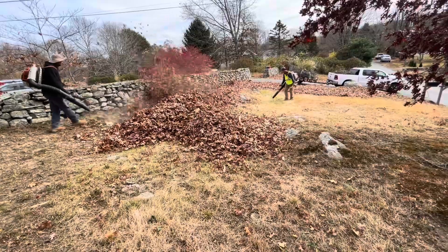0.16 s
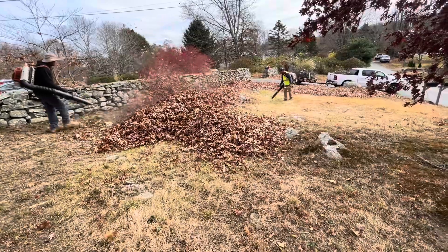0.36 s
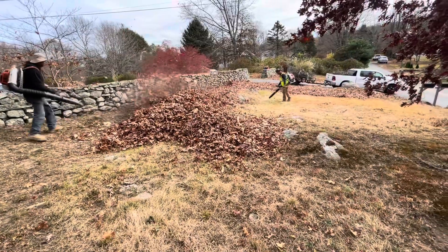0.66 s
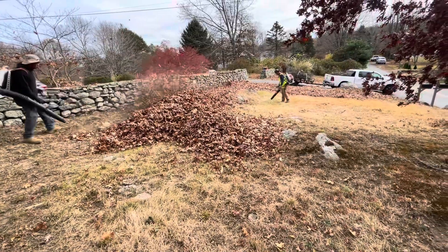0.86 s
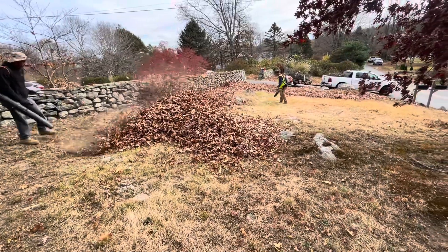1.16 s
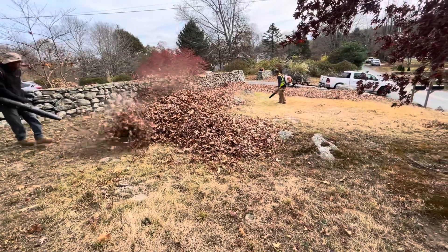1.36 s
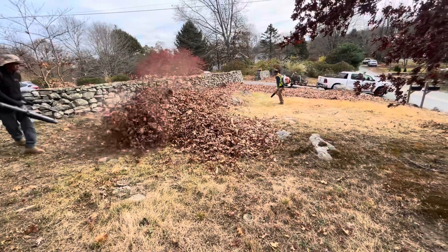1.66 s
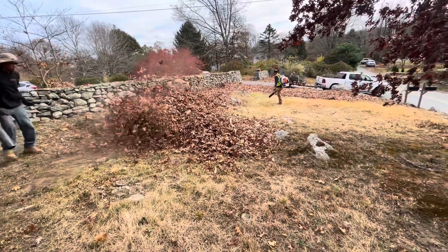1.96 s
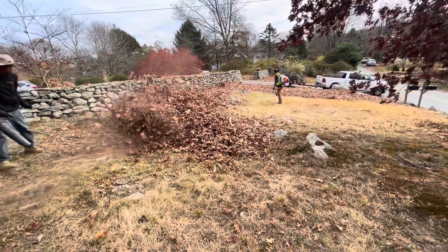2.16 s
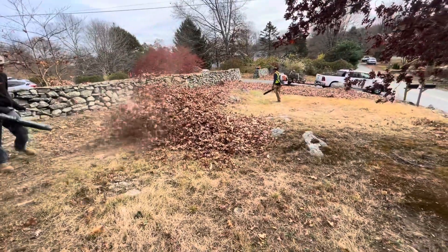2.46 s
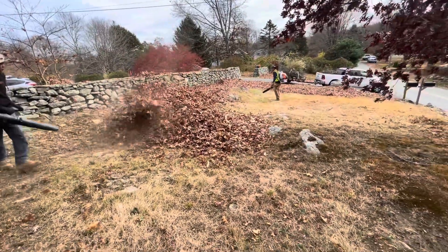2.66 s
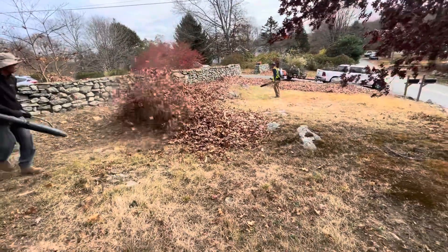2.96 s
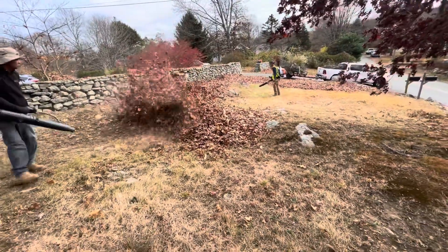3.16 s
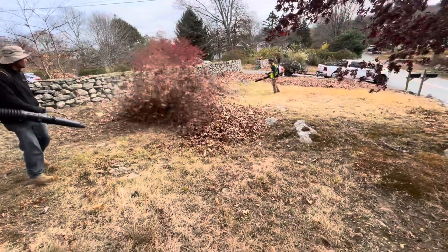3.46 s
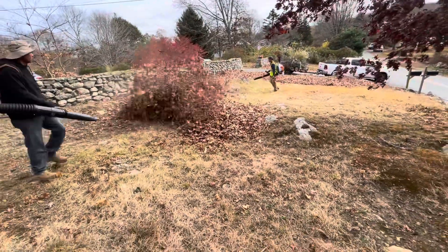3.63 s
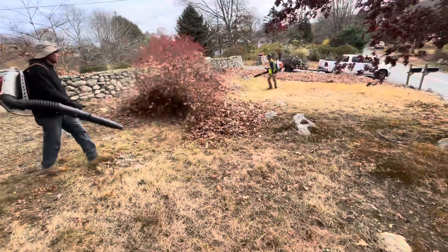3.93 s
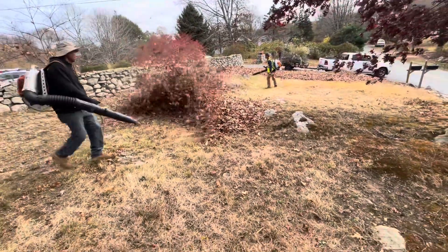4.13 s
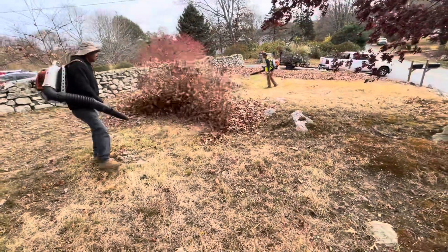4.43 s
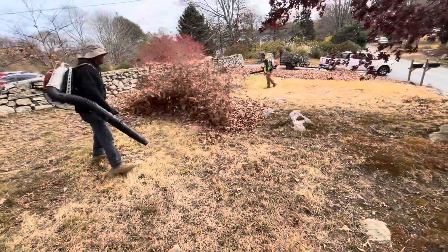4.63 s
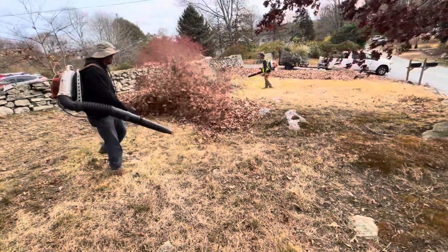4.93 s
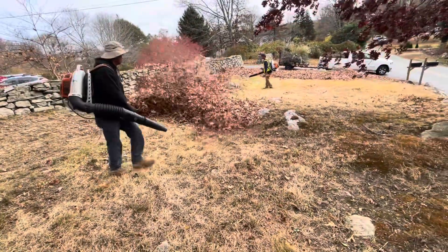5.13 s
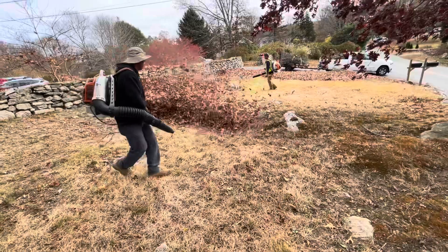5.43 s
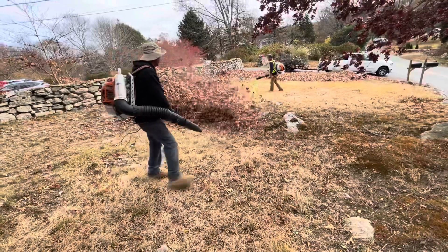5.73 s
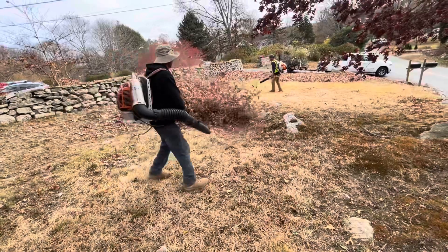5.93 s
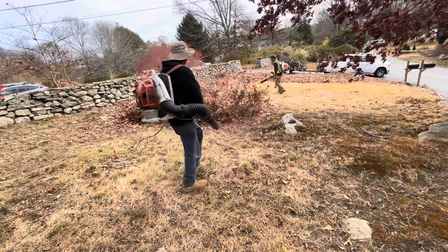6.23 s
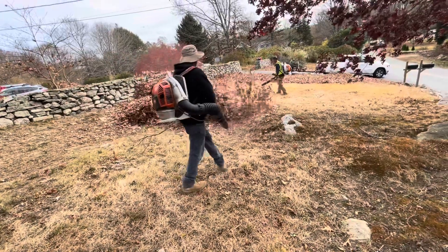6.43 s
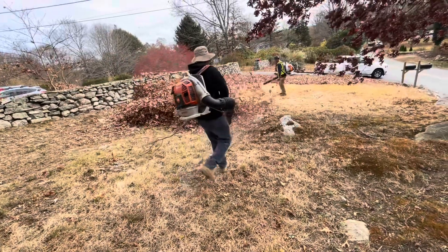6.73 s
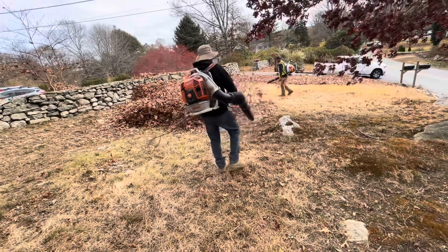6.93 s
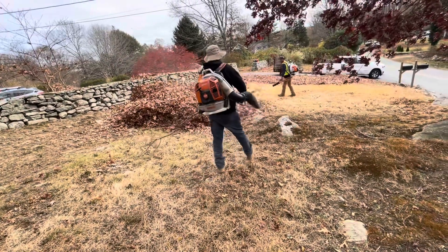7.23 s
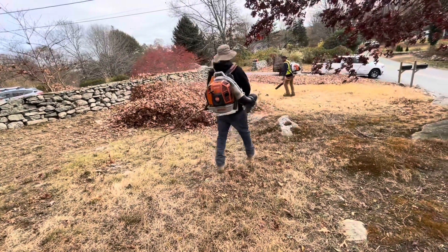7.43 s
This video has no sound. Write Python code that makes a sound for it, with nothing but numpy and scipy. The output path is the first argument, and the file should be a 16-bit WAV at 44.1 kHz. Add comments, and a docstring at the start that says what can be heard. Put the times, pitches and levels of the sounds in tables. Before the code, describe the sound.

A backpack leaf blower roars close by on the left, droning engine and rushing leafy air, while a second engine revs across a windy lawn.

```python
"""A four-stroke backpack leaf blower passes on the left of a phone, its engine summed from orders of the firing rate.
Its pipe roars from the start in patchy bands of noise, with leaves in the jet and valve clatter repeating every cycle.
From 1.2 s a second engine across the lawn revs up and falls back, a few tones tied to one gliding rate; low
noise thumps as wind gusts hit the ports. The near blower grows louder until 5 s, then swings from the left to ahead,
its carrier's back turned; at 6.2 s the far engine revs again briefly."""
import sys
import numpy as np
from scipy import signal
from scipy.fft import rfft, irfft, next_fast_len
from scipy.io import wavfile
from scipy.ndimage import uniform_filter1d, map_coordinates

SR = 44100
rng = np.random.default_rng(int(sys.argv[2]) if len(sys.argv) > 2 else 0)


def unload_audio(sound):
    """Save the sound as a 16-bit wav file, at the path given as the first command line argument."""
    columns = np.transpose(np.atleast_2d(sound))
    # keep every value between -1 and 1, then stretch to whole-number steps
    steps = np.round(np.clip(columns, -1, 1) * 32767)
    wavfile.write(sys.argv[1], SR, steps.astype(np.int16))


N = 334719
FRAME = 1024  # samples per short-time spectrum

# Bearing of the near blower: t/s, bearing (0 at the left to 1 ahead)
BEARING_PATH = [(0, 0.025), (2, 0.13), (4, 0.038), (5.5, 0.25), (6, 0.35), (7, 0.86), (7.59, 0.77)]


def amp(db):
    """Gain is ten to the power of level over 20."""
    return 10 ** (np.asarray(db) / 20)


def unit(x):
    """Normalisation: the signal at an rms value of 1."""
    return x / np.sqrt(np.mean(x ** 2) + 1e-20)


def along(points, at):
    """Linear interpolation of (place, value) points over a logarithmic place axis."""
    place, value = np.transpose(points)
    return np.interp(np.log(at + 1), np.log(place + 1), value)


def curves(rows):
    """Linear interpolation in time: one value per sample for each column after t/s."""
    s, *columns = np.transpose(rows)
    return [np.interp(np.arange(N) / SR, s, column) for column in columns]


def wobble(rate):
    """Random modulation: normal random knots, rate per second, joined by straight lines."""
    knots = rng.standard_normal(int(N * rate / SR) + 4)
    return np.interp(np.arange(N) * rate / SR, np.arange(len(knots)), knots)


def bump(s, length):
    """Gaussian rise and fall centred on s, length seconds wide between its 1/e points."""
    return np.exp(-(2 * (np.arange(N) / SR - s) / length) ** 2)


def noise(spectrum, patchy_db, bins, frames, clatter=0):
    """Spectral shaping: two independent noises share patches of random gain; the first may carry clatter."""
    source = rng.standard_normal((2, N))
    source[0] += clatter
    hz, _, z = signal.stft(source, SR, nperseg=FRAME)
    field = rng.standard_normal(z.shape[1:])
    field = uniform_filter1d(uniform_filter1d(field, bins, 0), frames, 1)
    inside = (hz > spectrum[0][0]) & (hz < spectrum[-1][0])
    gain = amp(along(spectrum, hz)[:, None] + patchy_db * unit(field))
    z = z * gain * inside[:, None]
    return unit(signal.istft(z, SR, nperseg=FRAME)[1][:, :N])


def wind():
    """Turbulent pressure at the ports: lumpy low thumps, their noise unrelated from port to port."""
    # Gusts: t/s, length/s, rise at left/dB, rise at right/dB
    gusts = [(1.42, .25, 4, 2), (1.9, .3, 6, 7), (2.06, .2, 5, 11), (2.33, 0.2, 11, 3), (2.8, .35, 7, 3),
             (3.15, .25, 9, 11), (3.33, .2, 8, 11), (3.6, 0.3, 10, 9), (4.2, 0.47, 6, 2), (4.66, .25, 8, 7),
             (4.92, .2, 9, 3), (5.28, .3, 9, 10), (5.55, .3, 4, 8), (6.2, .6, 2, 6), (6.6, 0.3, 5, 3),
             (7.05, .45, 10, 8)]
    # Spectrum of the buffeting: f/Hz, relative level/dB
    buffet = [(20, -40), (36, -22), (50, -2), (62, 2), (100, 0), (160, -3), (250, -43), (400, -60)]
    calm_db = np.array((-44.5, -46))[:, None]  # between gusts, left and right
    gust_db = sum(np.outer(rise_db, bump(s, length)) for s, length, *rise_db in gusts)
    lumps = amp(2.8 * np.array([wobble(15), wobble(21)]))
    thumps = unit(lumps * noise(buffet, patchy_db=0.5, bins=2, frames=3))
    return amp(calm_db + gust_db) * thumps


def far_engine():
    """Harmonic series of a firing rate: a few orders of the distant engine sound while it revs."""
    # Two bursts of revving, each with rows: t/s, fourth order f/Hz, level/dB before the colour
    bursts = [
        [(1.15, 160, -53), (1.38, 183.5, -55), (1.51, 196.5, -50), (1.67, 205, -41), (1.85, 213, -45),
         (2.1, 219, -45), (2.3, 222, -40.5), (2.6, 225.5, -43), (2.8, 227, -44), (3.1, 233, -37.5),
         (3.5, 235, -39.5), (4, 239, -37), (4.5, 238, -41), (4.62, 215, -46), (4.75, 190, -50)],
        [(6.2, 190, -43), (6.45, 202, -39), (6.6, 208, -43), (6.7, 208, -50)],
    ]
    # Multiples of the firing rate that stand out
    far_orders = (3, 4, 5, 9, 10, 11, 12, 13)
    # What its exhaust and the lawn let through: f/Hz, level/dB
    far_colour = [(140, -19), (180, -9), (200, 3), (240, -3.5), (265, -14), (460, -5), (520, -26), (550, 2),
                  (610, -10.5), (665, -3), (720, -12)]
    out = np.zeros(N)
    t = np.arange(N) / SR
    for rows in bursts:
        fourth_hz, level_db = curves(rows)
        rate = fourth_hz / 4  # firings per second
        angle = 2 * np.pi * np.cumsum(rate) / SR
        start, end = rows[0][0], rows[-1][0]
        fade = np.clip(np.minimum(t - start, end - t) / 0.036, 0, 1)
        for k in far_orders:
            order_db = level_db + along(far_colour, k * rate) + 1.6 * wobble(5)
            phase = round(k) * angle + .02 * k * wobble(8) + rng.uniform(0, 2 * np.pi)
            out += fade * amp(order_db) * np.cos(phase)
    return np.sqrt(2) * out


def carrier():
    """Distance and directivity: nearness and treble about their means, exhaust note in dB, and bearing."""
    # Near blower: t/s, loudness/dB, exhaust note level/dB, treble level of the jet/dB
    approach = [(0.0, -27.5, -27, -30), (0.04, -26.5, -27.5, -32), (0.59, -28, -27.5, -32),
                (1.22, -27, -30.5, -34), (2.28, -26.5, -27, -38), (2.56, -24.5, -26.5, -33),
                (2.73, -26, -27.5, -36), (3.34, -24.5, -26, -35), (3.74, -23, -26, -29),
                (4.18, -23, -26, -32), (4.46, -22, -28.5, -30.5), (4.69, -22, -25, -31),
                (5.22, -21, -25, -22.5), (6.24, -22.5, -30, -25), (6.59, -22, -27.5, -34.5),
                (6.96, -22.5, -29.5, -32.5), (7.53, -22.5, -28, -30.5), (7.59, -21.5, -29, -26)]
    near_db, note_db, treble_db = curves(approach)
    bearing, = curves(BEARING_PATH)
    return near_db - near_db.mean(), note_db, treble_db - treble_db.mean(), bearing


def air_levels():
    """Source directivity: each air layer's level follows distance, treble and bearing, with a slow unrest."""
    # A layer swells or sinks as the pipe swings: t/s, layer name, length/s, change/dB
    sweeps = [(.4, "roar", 0.86, 0), (0.604, "hiss", 0.74, 0), (1, "fizz", 1.1, 1), (2, "rumble", 0.43, 3),
              (2.1, "rush", 0.94, 2), (2.5, "hiss", 0.81, -2), (2.9, "sizzle", 1, -0.5),
              (4, "rush", 0.59, 3.5), (4.4, "roar", 0.55, -1.5), (4.904, "rush", 0.46, 1),
              (5.702, "sizzle", 2.5, 0), (6.094, "fizz", 1.7, -2), (6.397, "roar", 0.25, -2.5),
              (7.095, "roar", 0.88, -0.5), (6.6, "rumble", 0.9, 1), (2.9, "rumble", .7, -1),
              (.9, "rumble", 0.46, 1), (1.8, "roar", 0.93, 2), (.2, "rumble", .5, 0),
              (7.2, "sizzle", 0.83, 1), (7.253, "fizz", 0.43, 3), (7.4, "hiss", 0.53, -1)]
    near_db, _, treble_db, bearing = carrier()
    # base level/dB, dB per dB of nearness, dB per dB of treble, dB per unit of bearing
    layers = dict(
        rumble=(-38.5, 1.33, -0.18, 0),
        roar=(-30, 0.58, -0.06, -1.5),
        rush=(-35, -0.2, 0.42, 5),
        hiss=(-34, 0, 0.77, 0.5),
        sizzle=(-33.5, 0.02, 0.54, -0.5),
        fizz=(-37, 0.33, 0.5, 0.5))
    levels = {}
    for name, (db, per_near, per_treble, turned_db) in layers.items():
        steady_db = db + per_near * near_db + per_treble * treble_db + turned_db * bearing
        levels[name] = steady_db + .6 * wobble(6)
    for s, name, length, db in sweeps:
        levels[name] = levels[name] + db * bump(s, length)
    return levels


def valve_clatter(angle, change):
    """Cyclic noise: a random rattle that repeats every cycle and renews itself change times a second."""
    steps = 706  # random values per cycle
    pattern = rng.standard_normal((int(N * change / SR) + 3, steps))
    place = angle / (2 * np.pi) % 1 * (steps - 1)
    return unit(map_coordinates(pattern, [np.arange(N) * change / SR, place], order=1))


def air(angle):
    """Turbulence noise of fan, exhaust and leafy jet, level-modulated once a firing except in the rumble."""
    # Spectra of the six layers, low to high: f/Hz, relative level/dB
    rumble_band = [(120, -29), (190, -4), (260, -4.5), (340, -3.5), (410, -9), (450, -13), (520, -30)]
    roar_band = [(400, -16), (500, -13), (580, -12), (650, -11), (720, -7), (800, -6), (900, -9),
                 (980, -11), (1050, -15), (1200, -12.5), (1350, -10.5), (1500, -21.5), (1750, -47)]
    rush_band = [(1400, 5.5), (1650, 5), (2100, 2.5), (2450, -3), (2900, -2.5)]
    hiss_band = [(2300, -47), (2750, 5), (3300, 9.5), (3800, -2.5), (4100, -1), (4500, -5.5), (4900, -14)]
    sizzle_band = [(4300, 0), (4700, -0.5), (4900, 4), (5100, 1), (5300, 5), (5450, 0), (6300, 1),
                   (7200, -2.5), (8200, -9.5)]
    fizz_band = [(7200, -2.5), (7900, -1.5), (9300, 2), (9700, 2), (10000, 1), (10300, -2), (10700, -5),
                 (11100, -8), (11600, -13), (12300, -20), (13500, -35), (15500, -40)]
    db = air_levels()

    def beat(lag):
        """Periodic modulation at the firing rate, lag radians late, of slightly uneven depth."""
        return np.cos(angle - lag) * (1 + 0.1 * wobble(16))

    flutter = wobble(45)
    valves = valve_clatter(angle, change=10)
    rumble_db = db["rumble"]
    roar_db = db["roar"] + 0.23 * beat(1.0)
    rush_db = db["rush"] + .9 * beat(.8) + .2 * flutter
    hiss_db = db["hiss"] + 1.3 * beat(.6) + .3 * flutter
    sizzle_db = db["sizzle"] + 1.7 * beat(.6) + .4 * flutter
    fizz_db = db["fizz"] + 2.2 * beat(.9) + .7 * wobble(12)

    rumble = amp(rumble_db) * noise(rumble_band, patchy_db=1.2, bins=3, frames=20)
    roar = amp(roar_db) * noise(roar_band, patchy_db=1.6, bins=4, frames=9)
    rush = amp(rush_db) * noise(rush_band, patchy_db=1.1, bins=5, frames=30, clatter=.55 * valves)
    hiss = amp(hiss_db) * noise(hiss_band, patchy_db=1.1, bins=6, frames=24, clatter=.5 * valves)
    sizzle = amp(sizzle_db) * noise(sizzle_band, patchy_db=.9, bins=8, frames=20, clatter=.5 * valves)
    fizz = amp(fizz_db) * noise(fizz_band, patchy_db=.9, bins=16, frames=6, clatter=.4 * valves)
    return rumble + roar + rush + hiss + sizzle + fizz


def leader_levels():
    """Distance and directivity of tones: nearness and bearing set each leading order's level, and swells pass."""
    # Orders that lead their neighbours: order, base level/dB, dB per dB of nearness, dB per unit of bearing
    voices = [(1, -40, 0.5, -7), (4, -37.5, 3, 2), (7, -42, -0.6, -12), (8, -47.5, 2.5, 1.5),
              (10, -33.5, 1.52, 1), (12, -37, 2.3, -10), (14, -32.5, 0.3, -7), (16, -42, -0.16, -5.5),
              (19, -40.5, 2, -1.5), (3, -49, 0.5, 14.5), (5, -34.5, 2, 1.5), (6, -32, 2, -8.5),
              (9, -33, 0.83, -2), (11, -37, 3, 0), (13, -30.5, 0.1, 6), (15, -37, -0.4, 2),
              (21, -41, 0, 0.5), (24, -41, 1, -7), (17, -44.5, 2.3, -6), (22, -41.5, 1, 1.5),
              (25, -56, 1, -1), (20, -45, 1, 2.5), (23, -52, 0.5, 6)]
    # Single orders swell or sink as the carrier turns: t/s, order, length/s, change/dB
    swells = [(.05, 24, 0.44, 4), (.2, 7, 1.2, 7.5), (.3, 19, 1.5, 11), (.5, 16, 1, 6.5),
              (.55, 14, 0.75, -23), (1.05, 12, 0.3, 6), (1.4, 10, 0.48, 3), (1.7, 1, 1.5, 2),
              (1.94, 5, 0.3, 5), (2, 7, 0.57, 12), (2.3, 11, 0.54, 10.5), (2.6, 19, 1, -16),
              (3.11, 7, 0.34, -7), (3.1, 16, 1.36, -11), (3.2, 12, 0.55, 6), (3.452, 11, 0.33, 6.5),
              (3.6, 1, .9, 1), (3.75, 10, 0.44, -12), (3.75, 14, 0.27, -22), (4.047, 12, 0.46, 7.5),
              (4.05, 10, 0.24, 6.5), (4.355, 14, 0.25, -22), (4.35, 15, 0.52, -25), (4.667, 7, 0.3, 7),
              (4.7, 16, 1.7, 9.5), (5.603, 7, 2.5, 14), (6.202, 10, 0.76, -8), (6.298, 12, 0.38, 7),
              (6.342, 5, 0.92, -9), (6.395, 16, 0.34, 9.5), (0.5, 13, 0.51, -11), (0.626, 9, 0.94, 11),
              (.75, 21, 0.75, 7.5), (1.203, 13, 0.26, 3.5), (1.25, 24, 0.7, 5), (1.4, 3, 0.59, 8.5),
              (1.503, 6, 0.28, -6), (1.9, 11, .6, -4), (1.9, 3, 0.67, 9.5), (2.252, 24, 1.4, 15),
              (2.25, 21, 0.35, -18), (2.5, 9, 0.51, 4), (2.753, 3, 0.63, 9.5), (2.75, 5, 0.73, -3.5),
              (3.25, 24, 0.52, 3), (3.25, 21, 0.33, 5), (3.602, 9, 0.24, -7), (3.747, 15, 0.31, -27),
              (3.9, 11, 1.44, 6), (3.994, 9, 0.21, 6), (4.3, 13, 0.57, -1), (4.748, 3, 0.29, 8),
              (4.754, 11, 0.42, 5), (5.4, 24, 1.3, 11), (5.498, 9, 0.91, 6.5), (6, 11, 0.55, -14),
              (6.198, 21, 0.57, 8.5), (6.4, 24, 0.38, 6), (6.9, 15, .6, 0.5), (7.1, 6, 0.44, 1),
              (7.252, 9, 0.41, 6), (7.59, 13, 0.47, -5), (7.59, 11, 0.57, 2), (.5, 17, 1.2, 1),
              (2.3, 17, 1.7, -10), (6.4, 17, 0.41, 2), (1.999, 22, 0.63, 3.5), (6.8, 22, .9, -2),
              (6.3, 19, 0.35, 4), (7.4, 8, 0.61, 0), (3.7, 8, 1.5, -4), (1.9, 13, 2.6, -1),
              (1.2, 4, 1.9, 2.5), (1.865, 24, 0.2, 2), (2.55, 8, .3, 9), (4.2, 8, .5, 4),
              (2.057, 12, .35, 6), (1.65, 12, 0.14, 6), (1.9, 11, 0.21, 5), (6.4, 23, 0.44, 7.5),
              (6.857, 23, 0.33, 8), (7.298, 20, .6, 4.5), (5.25, 23, 0.31, 5), (5.3, 24, 0.35, 0),
              (5.304, 25, 0.24, 3.5), (2.152, 14, 0.097, 5.5), (1.4, 14, 0.13, 2.5)]
    near_db, note_db, _, bearing = carrier()
    levels = {}
    for k, db, per_near, turned_db in voices:
        levels[round(k)] = db + per_near * near_db + turned_db * bearing
    for s, k, length, db in swells:
        levels[round(k)] = levels[round(k)] + db * bump(s, length)
    levels[2] = note_db  # the exhaust note
    return levels


def near_engine():
    """Fourier synthesis from orders of the firing rate, each drifting on its own; also gives the cycle angle."""
    # Speed of the near engine: t/s, firing rate/(firings per s)
    speed = [(0, 62.48), (.5, 62.67), (.85, 62.53), (1.6, 62.73), (2, 62.75), (3, 62.37), (3.4, 62.5),
             (4, 62.47), (4.25, 62.32), (4.5, 62.52), (7, 62.52), (7.3, 62.33), (7.59, 62.39)]
    # Orders: multiple of the firing rate, level/dB on a common scale
    # (an order without its own voice keeps its difference from its leader)
    order_table = [(1, -11.5), (2, -1), (3, -13.8), (4, -7), (5, -8.5), (6, -3.5), (7, -5.5), (8, -18),
                   (9, -6), (10, -2.5), (11, -8.5), (12, -12), (13, -5), (14, -4.5), (15, -6.5), (16, -9),
                   (17, -39), (18, -1.5), (19, 8), (20, -7.5), (21, -2.5), (22, -2), (23, -7), (24, -9.6),
                   (25, -27), (26, -16), (27, -19), (28, -19), (29, -33), (30, -22), (31, -20), (32, -25),
                   (33, -24), (34, -35), (35, -25), (36, -42), (37, -22), (38, -30), (39, -34), (40, -25),
                   (41, -23), (44, -29)]
    # Group delay: order, lag within the cycle/turns
    timing = [(1, .42), (3, .4), (4, .55), (6, .36), (9, 0.133), (12, 0.022), (15, -.15), (19, .3),
              (40, .05)]
    blade_order = 24  # twelve fan blades, two turns a firing; no other order follows it
    bark_first, bark_last = 10, 16  # from behind these orders leave the muffler together as a sharp bark
    bark_split = .2  # turns per unit of bearing by which its even orders slip: a bark on each crank turn
    odd_lead_turns, odd_slip = .22, .3  # lead of the low odd orders; turns of it lost per unit of bearing

    rate, = curves(speed)
    bearing, = curves(BEARING_PATH)
    levels = leader_levels()
    leaders = np.array([k for k in levels if k != blade_order])
    table = {round(k): db for k, db in order_table}
    angle = 2 * np.pi * np.cumsum(rate) / SR
    # the crank turns twice a firing; as the lead shrinks the thump gathers into one beat
    odd_lead = odd_lead_turns - odd_slip * np.minimum(bearing, .4)
    scatter = wobble(30)  # firings never fall exactly on time
    out, lag = np.zeros(N), 0
    for k, db in table.items():
        behind = bearing * (bark_first <= k <= bark_last)
        loose = 1 - .45 * behind
        # group delay accumulates as phase from order to order: the thump trails the bark
        lag = lag + 2 * np.pi * along(timing, k) * loose
        if k in levels:
            level_db = levels[k]
        else:
            leader = leaders[np.argmin(np.abs(np.log(k / leaders)))]
            level_db = levels[leader] + db - table[leader] + 2.6 * wobble(2)
        drift_db = np.sqrt(k) * (.17 * wobble(14) + .4 * wobble(5) * (k != 2))
        reach = min(k, 14)  # timing errors turn the phase in proportion to the order, up to here
        shake = reach * (.008 * scatter + .007 * wobble(12))
        shake = shake + .11 * reach * loose * wobble(.8) * (k > 2)
        lead_turns = odd_lead * (k in (1, 3, 5)) + bark_split * behind * (k % 2 == 0)
        phase = k * angle - lag + shake + 2 * np.pi * lead_turns
        out += amp(level_db + drift_db) * np.cos(phase)
    return np.sqrt(2) * out, angle


def ports(tones, rushes):
    """Diffraction and interference: the phone's body delays and shades, the lawn echoes, air noise is part diffuse."""
    # Phase between the ports for a source on the left: f/Hz, lead of the left/rad
    left_lead = [(30, .4), (62, .5), (125, .55), (375, 1.6), (440, 2.2), (500, 3.25), (560, 3.1),
                 (690, 3.5), (780, 1.9), (1000, 2.3), (1062, 2.95), (1130, 2.5), (1500, 3.3), (3000, 9.1),
                 (4400, 15.4), (5000, 16.8), (6200, 21.8), (8000, 21.6), (8600, 18.4), (9050, 18.4),
                 (9600, 15.708), (10900, 15.708), (11600, 12.566)]
    # Lead lost once the source stands ahead: f/Hz, phase/rad
    ahead_loss = [(60, -0.1), (375, 2.5), (560, 3), (690, 4), (800, 1.5), (1000, 1.5), (1150, 0.5),
                  (1400, 5.5), (1900, -1), (2500, -1), (3600, 1.5), (6000, 10.5), (7300, 16), (7800, 0)]
    # Shading by the body: f/Hz, left minus right level/dB
    shade = [(60, -0.5), (250, 2), (400, -2), (440, -3.5), (500, 1.5), (560, 7.5), (680, 15), (1000, 0),
             (1150, -4), (1330, 6.5), (1550, 4.5), (2200, -2.5), (2600, 3.5), (2900, 3.5), (3300, 7.5),
             (3900, -2.5), (4500, 2.5), (5500, 10), (6200, 12), (6900, 18), (7300, 17), (7900, 4),
             (8400, 7.5), (9200, -1), (10000, 2), (12000, 2.5)]
    # Coherence of the air noise between the ports: f/Hz, likeness (0 to 1)
    alike = [(150, 1), (500, .8), (700, .4), (1000, .65), (2100, .7), (2600, .6), (3200, .8), (5000, .65),
             (7300, .25), (8200, .7), (9300, .8), (9800, .97), (10800, .97), (11200, .85), (11650, .9),
             (12400, .85)]
    # Inverted treble echo off the lawn: t/s, delay at left/ms, delay at right/ms
    lawn = [(0, 1.52, 1.1), (.7, 1.5, 1.08), (1.25, 1.46, 1.06), (4.1, 1.49, 1.11), (4.4, 1.28, 1.11),
            (5.1, 1.44, 1.09), (5.7, 1.5, 1.14), (5.85, 1.35, 1.36), (6.7, 1.36, 1.5), (6.9, 1.6, 1.66),
            (7.59, 1.63, 1.71)]
    # Reflection from the lawn: t/s, share of the sound returned
    lawn_share = [(0, 0.2), (.9, 0.3), (1.25, 0.17), (1.7, 0.026), (2.5, .05), (3, 0.21), (4.5, 0.3),
                  (4.75, 0.17), (5.2, 0.29), (6.8, 0.22), (7.2, 0.17), (7.59, 0.24)]
    # Bands of the near blower's sound swell or sink for a while:
    # t/s, length/s, centre f/Hz, width/Hz, left/dB, right/dB
    tints = [(0.49, 1.6, 2710, 270, 7, -7), (.5, 1.7, 2930, 250, -5, -4), (0.43, 1.2, 7900, 700, 2, 0.5),
             (.4, 1.2, 6200, 700, 0.5, 7), (1.2, 1.1, 7900, 1500, 1, 1), (1.6, 2.6, 1900, 450, -5.5, -3.5),
             (1.66, 3, 4750, 480, 0.5, -7), (2.1, 2, 4120, 730, 6, 2), (1.4, 1.3, 1000, 350, -2, -5),
             (3.6, 2, 5020, 350, 3.5, 4), (4.25, 0.6, 1730, 220, -2, 7.5), (4.2, 0.55, 3200, 500, 0.5, -2),
             (4.2, 1.2, 5900, 500, -2, 3), (5.25, 2.2, 5700, 570, 6, 7), (6.12, .8, 7400, 2300, -6, 1),
             (6.5, 0.83, 9000, 1370, 5, 6.5), (6, 0.62, 3400, 540, -5.5, -1.5),
             (6.35, 2.6, 3920, 500, 8.5, 6), (6, 0.79, 880, 600, 0.5, 2), (6.4, 3.1, 2270, 350, 5.5, -6),
             (6.76, 1.4, 2680, 450, 2.5, 6), (7.53, 0.75, 4970, 1200, -7, -11),
             (7.5, .8, 1570, 300, -4.5, -2.5), (7, 0.58, 7500, 600, 1.5, -2),
             (0.78, 0.71, 2080, 440, 6.5, 4.5), (.4, 1.4, 3450, 300, -3, 4), (0.79, 0.71, 4350, 400, -6, 2),
             (1.2, 1.4, 5000, 500, 2, 2), (2.2, 0.79, 3000, 320, 3.5, -1), (3.1, 1.9, 4710, 250, 4.5, -12),
             (4.4, 0.8, 3720, 300, 4, 8), (5, 0.87, 4700, 500, -4, -4), (5.5, 1, 2960, 250, -8, -2),
             (7.1, 0.93, 4050, 350, -9, -5), (6.2, 1.5, 2150, 280, -5.5, -13),
             (0.36, 1.2, 360, 100, 5, 2.5), (1.5, 2, 560, 61, -4.5, -0.5), (3.9, 2.3, 2190, 150, 4.5, -2),
             (7.3, 0.84, 2230, 280, -9, -11), (7.34, 1.2, 2380, 250, -1, 4), (4.8, 1.1, 5100, 250, 6.5, 4),
             (1.55, 1.1, 3370, 360, -5, -2), (6.5, 2.4, 430, 106, -3, -3), (3.7, 0.69, 990, 120, -11, -3),
             (6.7, 0.23, 940, 120, 4, 4), (6.38, 0.34, 1300, 400, 2.5, 0), (5.6, 1.2, 300, 60, 1.5, 3.5),
             (0.82, 0.32, 3260, 390, 6, 5), (3, 0.76, 5130, 300, 3, 3), (6.1, 0.92, 4100, 300, -3, -1),
             (6.4, .3, 1070, 280, 5, 4)]

    hz, t, (tone, air_a, air_b) = signal.stft(np.vstack([tones, rushes]), SR, nperseg=FRAME)
    f = hz[:, None]
    bearing = np.interp(t, *np.transpose(BEARING_PATH))
    lead = along(left_lead, f) - along(ahead_loss, f) * bearing
    slide = 1 + .14 * bearing * (f < 4000)  # the shadows slip down as the source comes round
    tilt = amp(along(shade, f * slide) * (1 - 0.2 * bearing) / 2)
    share = np.sqrt(2 / (tilt ** 2 + tilt ** -2))  # shading keeps the summed power of both ports

    s, *delays_ms = np.transpose(lawn)
    left_ms, right_ms = [np.interp(t, s, ms) for ms in delays_ms]
    treble_only = along([(1500, 0), (3000, .6), (4800, 1), (8000, 1), (9600, 0)], f)
    bounce = np.interp(t, *np.transpose(lawn_share)) * treble_only

    def comb(ms):
        """Comb filtering: the direct sound less a delayed copy."""
        return 1 - bounce * np.exp(-2j * np.pi * f * ms / 1000)

    # two independent noises mixed in opposite sense have coherence cos(2 * turn)
    turn = np.arccos(np.clip(along(alike, f), 0, 1)) / 2
    common, opposed = np.cos(turn) * air_a, np.sin(turn) * air_b
    left = (tone + common + opposed) * tilt * np.exp(.5j * lead) * comb(left_ms)
    right = (tone + common - opposed) / tilt * np.exp(-.5j * lead) * comb(right_ms)

    tint_db = 0
    for s, length, centre, width, *db in tints:
        patch = np.exp(-(2 * (f - centre) / width) ** 2 - (2 * (t - s) / length) ** 2)
        tint_db = tint_db + np.multiply.outer(db, patch)
    spectra = share * amp(tint_db) * np.array([left, right])
    return signal.istft(spectra, SR, nperseg=FRAME)[1][:, :N]


def scene():
    """Superposition: the near blower is diffracted, the far one differs only in level, wind acts on each port."""
    far_pan_db = -4  # the far engine stands ahead: left minus right
    far = far_engine() * amp([[far_pan_db / 2], [-far_pan_db / 2]])
    near, angle = near_engine()
    return ports(near, air(angle)) + far + wind()


def record(dry):
    """Band limiting: the phone keeps nothing from its top frequency upwards."""
    top_hz = 15789
    m = next_fast_len(N + SR // 2)
    kept = np.fft.rfftfreq(m, 1 / SR) < top_hz
    return irfft(rfft(dry, m) * kept, m)[:, :N]


dry = scene()
out = record(dry)
unload_audio(out)
```